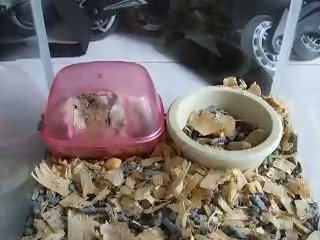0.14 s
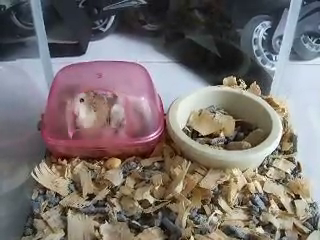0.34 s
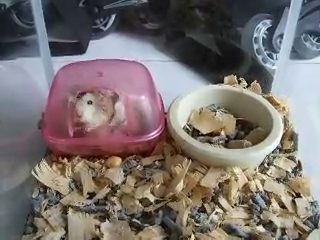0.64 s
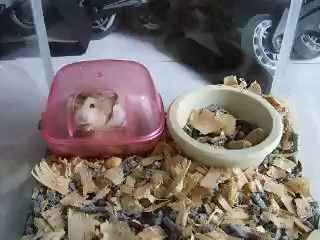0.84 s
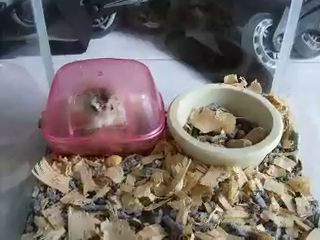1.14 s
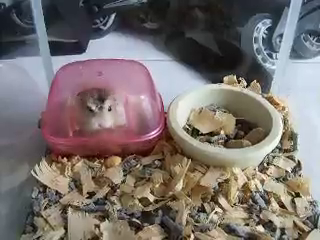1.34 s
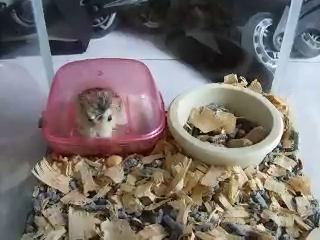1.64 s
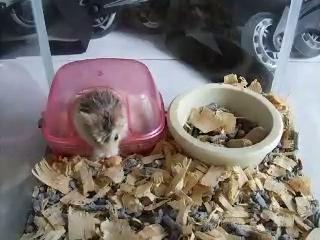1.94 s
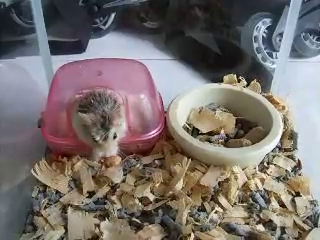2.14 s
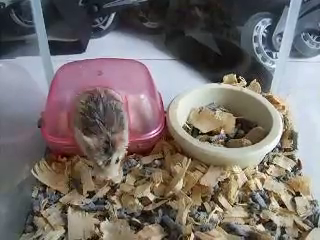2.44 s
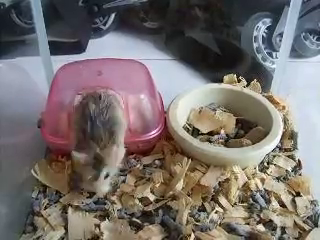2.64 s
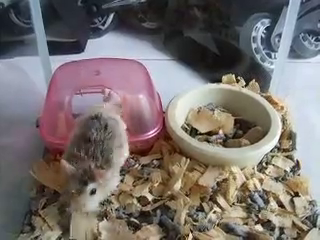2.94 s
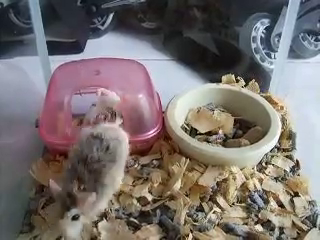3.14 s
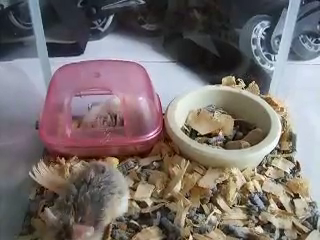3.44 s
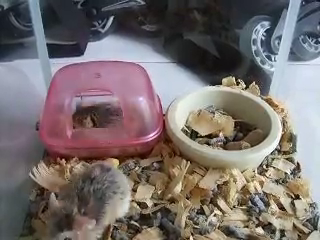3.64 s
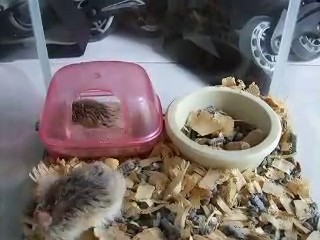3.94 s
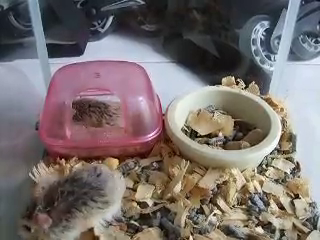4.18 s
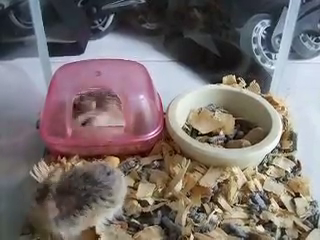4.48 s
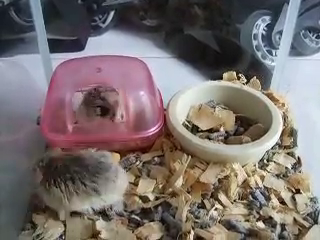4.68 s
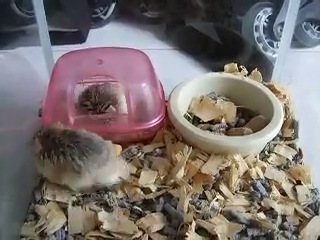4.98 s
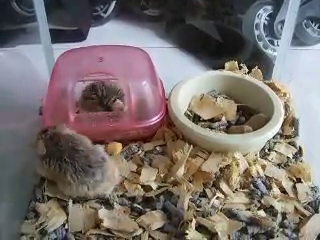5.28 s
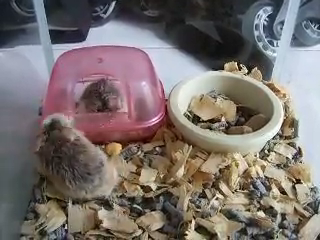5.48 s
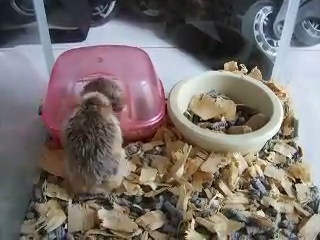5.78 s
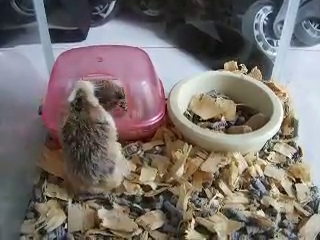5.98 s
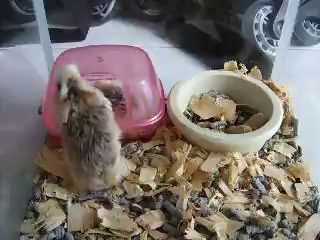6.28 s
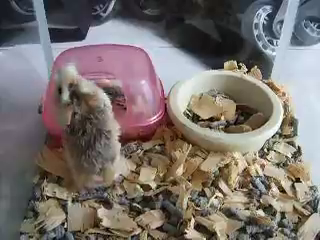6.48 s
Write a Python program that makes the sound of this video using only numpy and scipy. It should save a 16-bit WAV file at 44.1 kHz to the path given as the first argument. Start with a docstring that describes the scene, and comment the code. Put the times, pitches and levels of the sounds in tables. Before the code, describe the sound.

Faint, close rustling of wood shavings and small claws ticking on plastic, while a fan and distant traffic hum behind.

```python
"""Dwarf hamsters in their cage

Close to the microphone, two hamsters potter about: feet crush wood shavings, and claws tick and scrape
on a plastic hideout, which once bumps the floor. Behind them the room hums with a fan and far traffic.
Out in the street an engine speeds up and something, perhaps a brake, squeals with a flutter."""
import sys
import numpy as np
from scipy import signal
from scipy.fft import rfft, irfft
from scipy.io import wavfile

SR = 44100
rng = np.random.default_rng(int(sys.argv[2]) if len(sys.argv) > 2 else 0)


def store_pcm(level_fs):
    """Save levels as 16-bit WAV."""
    pcm = np.round(np.clip(level_fs, -1, 1) * 32767).astype(np.int16)
    wavfile.write(sys.argv[1], SR, np.atleast_2d(pcm).T)


N = 291716
TIME = np.arange(N) / SR
FREQS = np.maximum(np.arange(N // 2 + 1) * SR / N, .1)


def from_db(db):
    """Decibels to gain."""
    return 10 ** (np.asarray(db) / 20)

def rms_one(x):
    """Scale to unit rms."""
    return x / np.sqrt(np.mean(x ** 2) + 1e-20)

def envelope(start, length, attack, release):
    """Rises over the attack, holds until the length is up, then falls over the release."""
    return np.clip((TIME - start) / attack, 0, 1) * np.clip(1 - (TIME - start - length) / release, 0, 1)

def colour(points):
    """Gain at every frequency from a short spectrum, falling steeply past its ends."""
    hz, db = np.transpose(points)
    ends = np.minimum(1, np.minimum(FREQS / hz[0], hz[-1] / FREQS)) ** 4
    return from_db(np.interp(np.log(FREQS), np.log(hz), db)) * ends

def noise(gain):
    """Noise whose density per root Hz is the given gain."""
    return irfft(rfft(rng.standard_normal(N)) * gain, N) * np.sqrt(SR / 2)

def drift(rate_hz):
    """Smooth random wander of unit rms."""
    return rms_one(noise(1 / (1 + (FREQS / rate_hz) ** 2)))

def tone(hz):
    """A sine of unit rms along a pitch curve."""
    return np.sqrt(2) * np.sin(2 * np.pi * (np.cumsum(hz) / SR + rng.random()))

def ring(clicks, hz, t60_s):
    """Each click sets a damped sine ringing."""
    decay, step = from_db(-60 / (t60_s * SR)), 2 * np.pi * hz / SR
    return signal.lfilter([0, np.sin(step)], [1, -2 * decay * np.cos(step), decay ** 2], clicks + 1e-18)

def grains(per_s, spread_db):
    """Random tiny fractures of uneven size, at unit rms."""
    sizes = from_db(spread_db * np.minimum(rng.exponential(1, N), 4)) * rng.choice([-1, 1], N)
    return rms_one(sizes * (rng.random(N) < per_s / SR))


# Resonances of the room around the cage: centre_hz, width_hz, level_db
ROOM_RESONANCES = [(137, 25, -61.5), (168, 20, -61.5), (191, 13, -63), (227.6, 17.6, -59.5),
                   (268, 25.4, -56.5), (316, 7.8, -66.5), (364, 24, -76.5), (538, 7.6, -66), (559, 37, -72),
                   (1184, 110, -76.5)]
def room_hum(gain_db=0.1):
    """Fan and street noise booms in the room's resonances."""
    power = sum(from_db(db) ** 2 / (1 + 2 * ((FREQS - hz) / width) ** 2) ** 2
                for hz, width, db in ROOM_RESONANCES)
    return from_db(gain_db) * noise(np.sqrt(power))

# Fan and street, well behind the cage: frequency_hz, level_db
RUSH_SPECTRUM = [(55, -68.5), (70, -66.5), (105, -69.5), (290, -72.5), (335, -82.5), (440, -79.5),
                 (640, -74.5), (720, -69), (850, -66), (950, -68.5), (1080, -78.5), (1280, -81.5),
                 (1500, -89)]
def fan_and_street(start_db=-1.47, rise_db_per_s=0.3456):
    """A broad rush of fan and far traffic that slowly grows."""
    return from_db(start_db + rise_db_per_s * TIME) * noise(colour(RUSH_SPECTRUM))

# Low end of the building all around: frequency_hz, level_db
RUMBLE_SPECTRUM = [(18, -69.5), (23, -59), (28, -63), (34, -57.5), (43, -67), (55, -67.5), (80, -77)]
# Chance wavering of the rumble at the microphone: time_s, level_db
RUMBLE_LEVELS = [(0.05, -42), (0.39, -49), (1.92, -46), (1.95, -56), (2.1, -45), (2.74, -50), (3.86, -40),
                 (3.91, -47.5), (6.5, -51.5)]
def deep_rumble(swing=.7):
    """A deep rumble whose level wavers at random; swing scales the wavering."""
    waver_db = np.interp(TIME, *np.transpose(RUMBLE_LEVELS))
    return from_db(swing * (waver_db - waver_db.mean())) * noise(colour(RUMBLE_SPECTRUM))

# Room air at the microphone: frequency_hz, density_db_per_hz
HISS_SPECTRUM = [(1000, -91.5), (1650, -86.5), (2350, -90.5), (2650, -86.5), (3100, -89), (3700, -90.5),
                 (4700, -91.5), (5400, -90), (7900, -92.5), (8500, -96.5)]
def air_hiss():
    """The air gives a thin, steady hiss."""
    return noise(colour(HISS_SPECTRUM))

# Engines far off in the street: start_s, length_s, pitch_hz, climb_hz_per_s, level_db
ENGINE_NOTES = [(0, .85, 116.9, 12, -46.5), (.87, .7, 128, 11, -38.5), (5.03, 0.59, 273, 5, -41),
                (5.9, 0.14, 272, -0.5, -42), (6.32, 0.15, 276, -1, -37.5)]
def engines(waver_db=0.4):
    """Only one low note of each engine comes through the walls."""
    out = np.zeros(N)
    for start, length, hz, climb, db in ENGINE_NOTES:
        swell = envelope(start, length, attack=.12, release=.15)
        out += swell * from_db(db + waver_db * drift(6)) * tone(hz + climb * (TIME - start))
    return out

def street_squeal(start_s=3.9, settled_hz=3016, climb_hz=68, settle_s=.15, flutter_hz=53):
    """Two fluttering tones outside; echoes smear them more after the first burst, the upper one most."""
    age = np.maximum(TIME - start_s, 0)
    hz = settled_hz - climb_hz * np.exp(-(age / settle_s) ** 2)
    burst = envelope(start_s, length=.075, attack=.02, release=.04)
    waver_db = 1.5 * (1 - burst) * drift(8)
    main_db = -50 + 8.5 * burst - 11 * age + waver_db   # a loud burst, then a fading tail
    upper_db = -55.5 - 8.5 * age
    depth = .7 + .2 * burst
    wobble = tone(flutter_hz * (1 + .06 * drift(10))) / np.sqrt(2)
    flutter = (1 + depth * wobble) / np.sqrt(1 + depth ** 2 / 2)
    out = np.zeros(N)
    for pitch, db, direct in ((hz, main_db, depth), (hz * 1.127, upper_db, depth / 2)):
        echoes = (drift(35) * tone(pitch) + drift(35) * tone(pitch + 12 * drift(19.5))) / np.sqrt(2)
        out += from_db(db) * (direct * flutter * tone(pitch) + np.sqrt(1 - direct ** 2) * echoes)
    return envelope(start_s, length=1.6, attack=.02, release=.04) * out

# Bright modes of the hideout, close to the microphone: pitch_hz, level_db, t60_s
SHELL_MODES = [(1660, -15, 0.016), (2240, -11.5, .015), (2596, -8, 0.033), (2827, -4.5, 0.018),
               (3290, -9.5, 0.029), (3910, -13.5, .015), (4970, -13.5, .014), (5700, -12, 0.02),
               (6130, -11.5, .012), (7500, -15.5, 0.011)]
def hideout_ring(push):
    """The plastic shell rings in all its modes, alternating in sign."""
    return sum((-1) ** k * from_db(db) * ring(push, hz, t60)
               for k, (hz, db, t60) in enumerate(SHELL_MODES))

# Low modes of the hideout where it stands: pitch_hz, level_db, t60_s
BOOM_MODES = [(430, -25, .02), (559, 2, 0.026), (685, -7, 0.016)]
def hideout_boom(push):
    """The hideout as a whole booms on the cage floor."""
    return sum(from_db(db) * ring(push, hz, t60) for hz, db, t60 in BOOM_MODES)

# Knocks on the cage floor, close by: start_s, push_db
FLOOR_BUMPS = [(2.8356, -21), (2.843, -33)]
def hideout_bump(soft_hz=1000):
    """A hamster's soft body drops off the doorway and the hideout bumps the floor dully."""
    clicks = np.zeros(N)
    for start, db in FLOOR_BUMPS:
        clicks[round(start * SR)] = from_db(db)
    soft_body = signal.butter(2, soft_hz, fs=SR, output="sos")
    return hideout_boom(signal.sosfilt(soft_body, -clicks + 1e-18))

def paw_slip(start_s=6.04, length_s=.038, top_hz=3420, fall_hz_per_s=23000, level_db=-47):
    """A paw sticks and slips down the plastic with a rough, falling squeak."""
    hz = top_hz - fall_hz_per_s * np.clip(TIME - start_s, 0, length_s)
    level = from_db(level_db) * envelope(start_s, length_s, attack=.005, release=.005)
    roughness = from_db(3 * drift(300))
    jitter = 1 + .0634 * drift(592)
    return level * rms_one(roughness * tone(hz * jitter))

# Single paw strokes, close by: start_s, level_db, length_s, centre_hz
PAW_STROKES = [(0.368, -52, 0.014, 6000), (0.664, -49, .015, 3200), (0.691, -43, 0.028, 6300),
               (0.86, -47, 0.023, 7000), (1.154, -44.5, 0.02, 6000), (1.364, -46, 0.028, 4500),
               (1.548, -47, .015, 6000), (1.861, -39.5, .011, 6200), (1.892, -33, 0.0063, 5300),
               (1.905, -44, 0.021, 5500), (2.051, -40.5, 0.019, 5500), (2.118, -40.5, .011, 5350),
               (2.178, -43, 0.034, 6000), (3.204, -44.5, .018, 7000), (3.25, -47, .022, 6500),
               (3.308, -42.5, .01, 6200), (3.341, -44, 0.0134, 7040), (3.488, -46, 0.028, 3800),
               (3.612, -39, 0.021, 6400), (4.765, -47, .025, 6000), (5.656, -42.5, 0.017, 2900),
               (5.676, -42.5, 0.025, 4900), (5.903, -41, 0.029, 7000), (6.224, -47, .012, 3000)]
def paw_scrapes(width_octaves=0.99):
    """Each scrape is a short dense run of fractures that starts fast and dies away."""
    out, fractures = np.zeros(N), grains(per_s=6300, spread_db=1.5)
    for start, db, length, hz in PAW_STROKES:
        span = slice(int(start * SR), int((start + .15) * SR))
        progress = np.maximum(TIME[span] - start, 0) / length
        stroke = (1 - np.exp(-progress * 12)) * np.exp(-progress ** 2)
        edges_hz = hz * 2 ** (np.array([-.5, .5]) * width_octaves)
        band = signal.butter(2, edges_hz, "band", fs=SR, output="sos")
        out[span] += from_db(db) * stroke * rms_one(signal.sosfilt(band, fractures[span]))
    return out

# Crushed wood shavings at close range: frequency_hz, level_db
SHAVINGS_SPECTRUM = [(1200, -17), (2200, -4), (3600, -4.5), (4800, -4.5), (5500, -1.5), (6000, 1.5),
                     (6500, -0.5), (7300, 4), (7850, -1.5), (8600, -2.5)]
# Movement in the bedding by the microphone: start_s, length_s, level_db, wall_db, rocking_db
# The last two, relative to the rustle, are the hideout being rubbed and rocked.
BEDDING_BOUTS = [(0.258, .34, -58.5, -10, -8), (.61, .36, -47.5, -10, -7), (0.974, 0.19, -53, -10, -3),
                 (1.35, 0.37, -57, -12, -8), (1.712, 0.22, -53.5, -8, -12), (2.025, 0.088, -48.5, -10, -9),
                 (2.312, 0.18, -51.5, -12, -3), (2.565, 0.57, -55, -3, -2), (3.187, .22, -47, -8, -4),
                 (3.42, .23, -47.5, -3, 0.5), (3.658, .11, -51, -1, 0), (3.81, 0.36, -58, -2, -6),
                 (4.358, 0.18, -52, -1.5, -2), (4.597, 0.247, -53, -2, -4.5), (4.923, 0.25, -54, -1.5, -7),
                 (5.618, .13, -48, -3, -4), (5.827, .16, -48, -8, -4), (6.016, 0.21, -48.5, -3, -1.5),
                 (6.258, 0.1, -54.5, -2, 0), (6.547, .06, -47.5, -9, -6)]
def bedding_rustle(gain_db=-0.82, crushes_per_s=200, crush_s=.004, sliding=0.23, uneven_db=1.1):
    """Shavings give way in sudden little crushes underfoot; part of the rubbing drives the hideout."""
    onsets = (rng.random(N) < crushes_per_s / SR) * rng.uniform(.5, 1, N)
    crushes = signal.lfilter([1], [1, -np.exp(-1 / (crush_s * SR))], onsets + 1e-18)
    paw_weight = from_db(uneven_db * drift(13))
    effort = from_db(gain_db) * rms_one((sliding + np.sqrt(crushes)) * paw_weight)
    fractures = grains(per_s=6000, spread_db=2.0)
    flakes = rms_one(irfft(rfft(fractures) * colour(SHAVINGS_SPECTRUM), N))
    rubs = grains(per_s=2500, spread_db=2.0)
    wall, rocking = rms_one(hideout_ring(rubs)), rms_one(hideout_boom(rubs))
    out = np.zeros(N)
    for start, length, db, wall_db, rocking_db in BEDDING_BOUTS:
        bout = from_db(db) * envelope(start, length, attack=.025, release=.05)
        out += bout * (flakes + from_db(wall_db) * wall + from_db(rocking_db) * rocking)
    return effort * out

# Claws on the plastic, right by the microphone: start_s, level_db, hardness_db
CLAW_STRIKES = [(1.004, -44, 10), (1.0814, -42, 11), (1.3169, -21.5, -3), (1.7375, -37, 0),
                (2.0706, -40, 6), (2.1215, -42, 8), (2.6285, -37, -1), (3.283, -44, 6), (3.379, -36, -1.5),
                (3.452, -41, 0), (3.514, -35, 0), (3.6125, -36, -2), (3.754, -39, -2), (3.832, -44, 11),
                (4.594, -38, 4), (5.686, -34.5, 6), (5.9575, -50, 10), (6.014, -31.5, -10),
                (6.27, -42.5, 12)]
def claw_taps(crack_s=0.003, crack_db=-8):
    """A claw lands with a brief crack, louder for a harder tap, and sets the shell ringing."""
    clicks, cracks = np.zeros(N), np.zeros(N)
    for start, db, hardness_db in CLAW_STRIKES:
        at = round(start * SR)
        clicks[at] = from_db(db)
        decay = np.exp(-np.minimum(TIME[:N - at] / crack_s, 20))
        cracks[at:] += from_db(db + hardness_db + crack_db) * decay
    return hideout_ring(clicks) + cracks * rms_one(noise(colour(SHAVINGS_SPECTRUM)))


def scene():
    """One microphone close to the cage, with the room and the street behind it."""
    room = room_hum() + fan_and_street() + deep_rumble() + air_hiss()
    street = engines() + street_squeal()
    cage = bedding_rustle() + paw_scrapes() + claw_taps() + hideout_bump() + paw_slip()
    return (room + street + cage)[None]

def record(dry):
    """The microphone's signal is cut steeply above 8250 Hz."""
    return signal.sosfilt(signal.butter(36, 8250, fs=SR, output="sos"), dry)


dry = scene()
out = record(dry)
store_pcm(out)
```